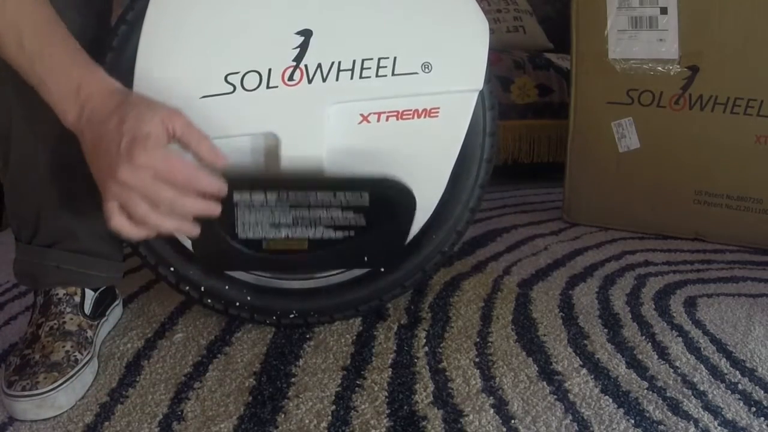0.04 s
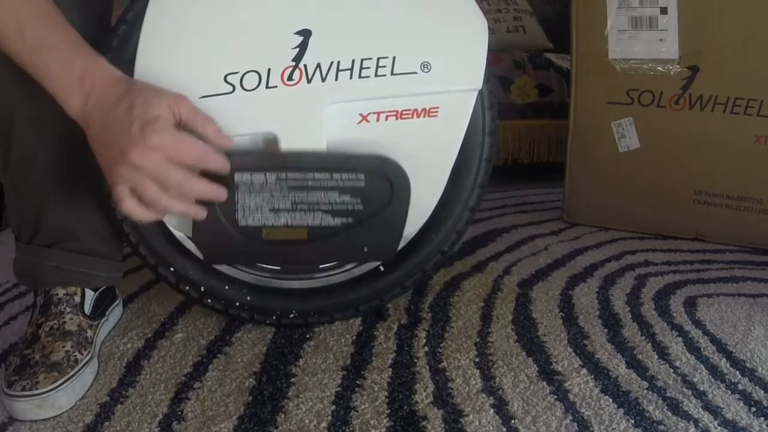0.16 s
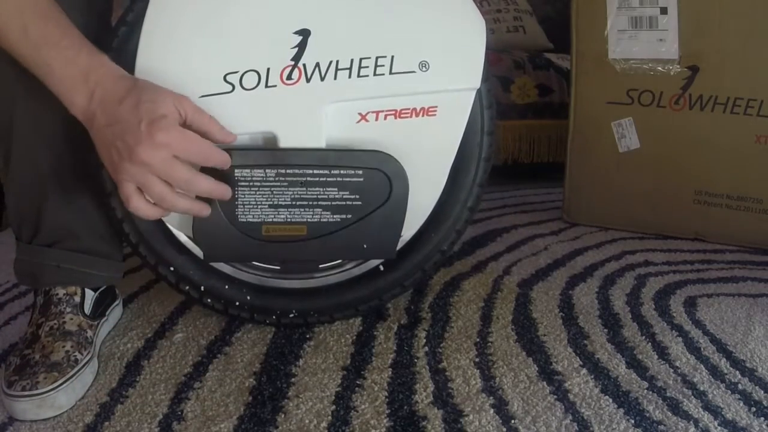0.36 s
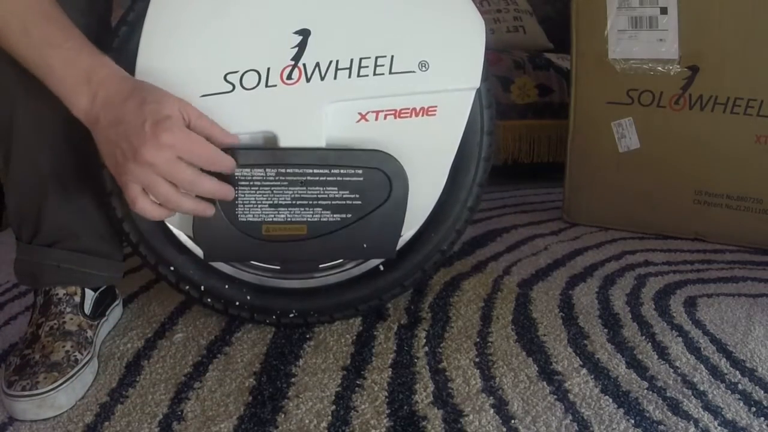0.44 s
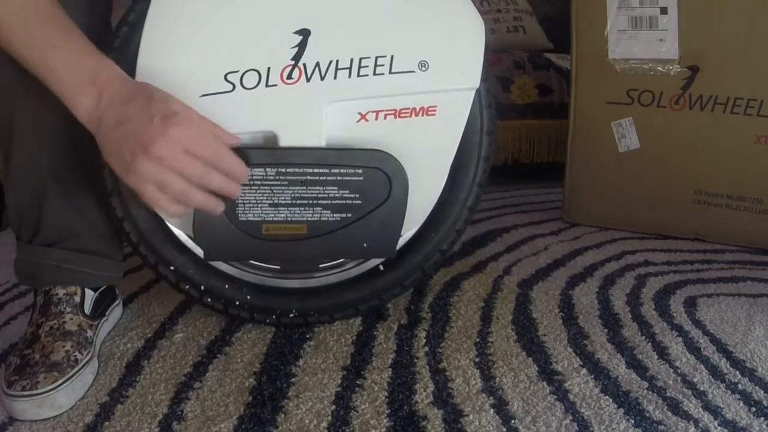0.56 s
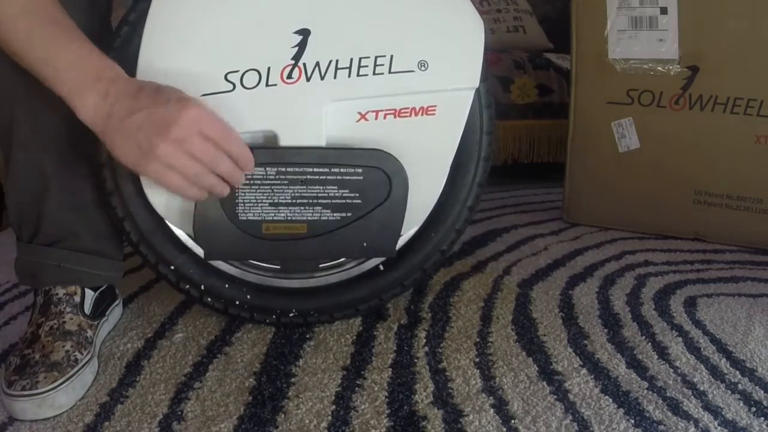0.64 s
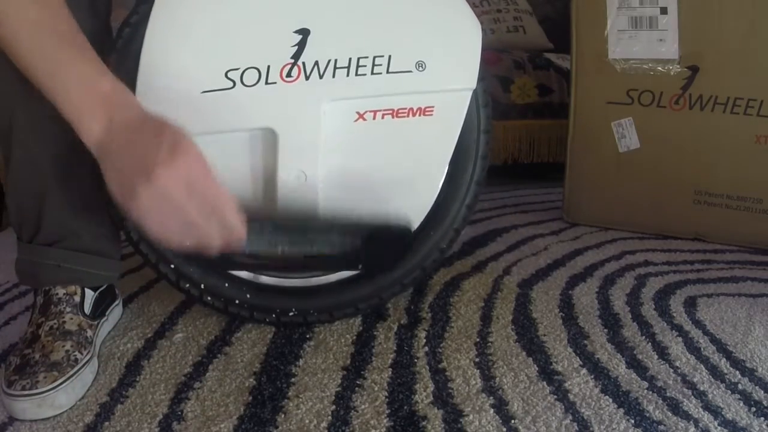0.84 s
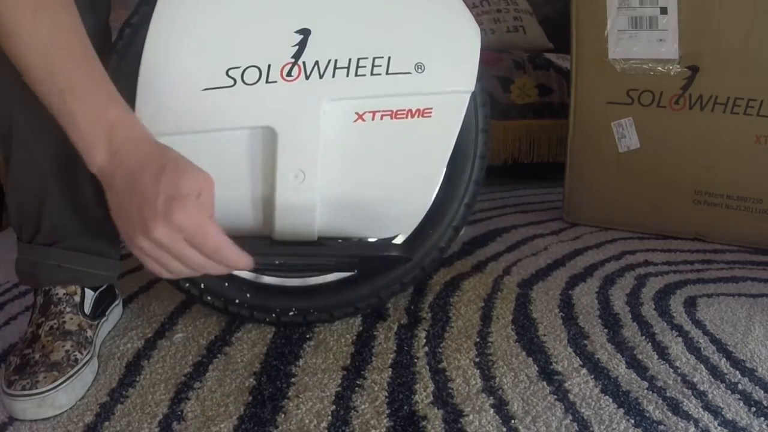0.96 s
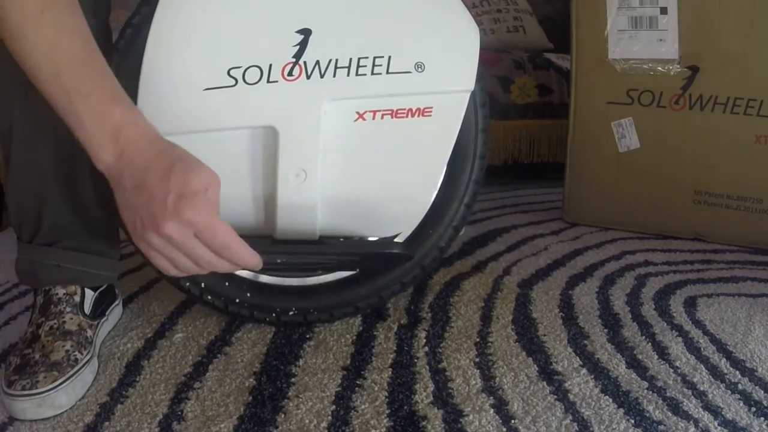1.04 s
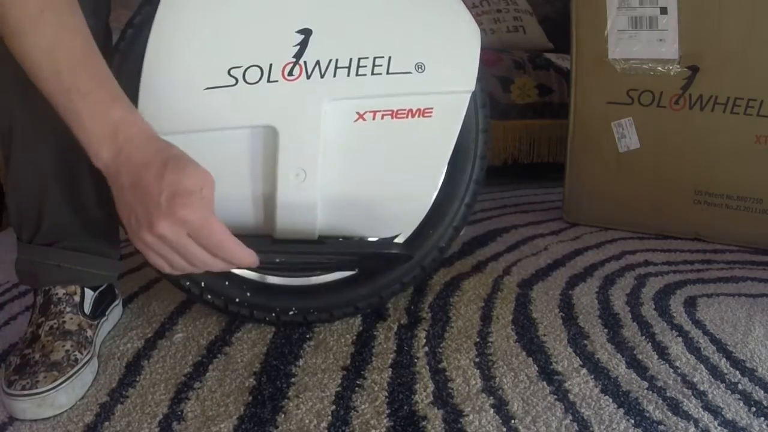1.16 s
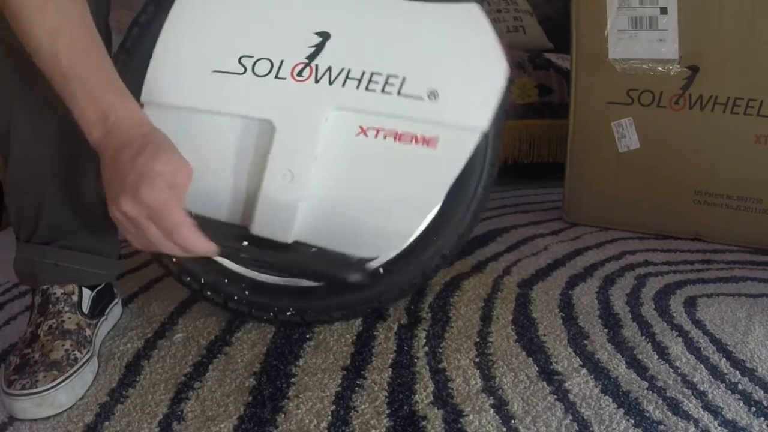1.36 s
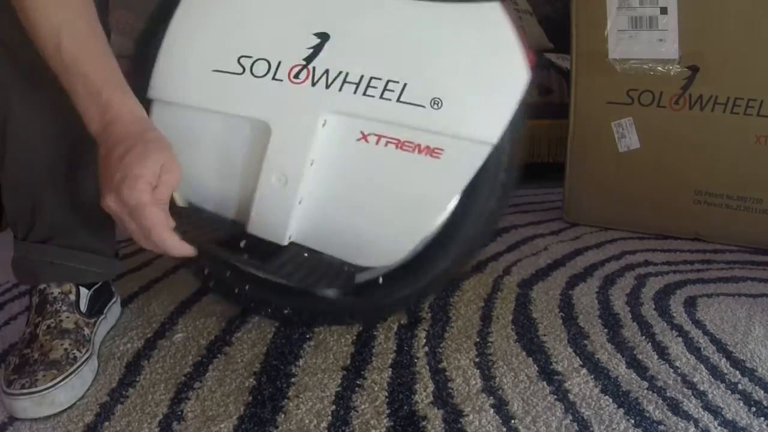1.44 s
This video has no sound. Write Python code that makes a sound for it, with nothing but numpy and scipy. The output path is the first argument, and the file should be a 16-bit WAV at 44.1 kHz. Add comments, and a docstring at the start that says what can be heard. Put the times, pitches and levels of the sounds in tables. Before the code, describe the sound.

A folding footpedal snaps loudly against a hollow plastic shell, then rattles back down with a thud

```python
"""A loud short pop, then two light rattles with a low thud, in a carpeted room with quiet air noise.
A hand folds the metal footpedal of a one-wheeled vehicle up: it snaps against the hollow plastic shell and rings it.
Folded down again, it rattles onto its hinge stop twice and thuds through the tyre; fingers nudge and rub it.
Contacts are filtered clicks that ring tuned modes, with noise for crunch, room tail and air.
The recorder's limiter ducks just ahead of the snap and recovers slowly."""
import sys
import numpy as np
from scipy import signal
from scipy.io import wavfile
from scipy.ndimage import minimum_filter1d

SR = 44100
rng = np.random.default_rng(int(sys.argv[2]) if len(sys.argv) > 2 else 0)


def store_wav(level_fs):
    """Save 16-bit WAV to argv[1]."""
    pcm = np.round(np.clip(np.atleast_2d(level_fs), -1, 1) * 32767)
    wavfile.write(sys.argv[1], SR, pcm.T.astype(np.int16))


def voltage_ratio(decibels):
    """Convert decibels (scalar or array-like) to amplitude ratios, 20 dB per decade."""
    exponent = np.asarray(decibels, float) / 20
    return 10 ** exponent


N = 66150  # 1.5 s


def rms_one(x):
    """Scale to rms 1."""
    return x / np.sqrt(np.mean(x ** 2) + 1e-20)


def at_hz(points, hz):
    """Read a table of (Hz, value) rows on a log-frequency axis."""
    table_hz, values = np.array(points).T
    return np.interp(np.log(hz), np.log(table_hz), values)


BAND_EDGES_HZ = 22 * 2 ** np.arange(0, 9.6, .5)


def bands(length):
    """Half-octave bands of noise with their centres; neighbours are unrelated."""
    settle = 4000  # samples dropped while the filters start up
    white = rng.standard_normal((2, length + settle))
    for k, (low, high) in enumerate(zip(BAND_EDGES_HZ, BAND_EDGES_HZ[1:])):
        band_pass = signal.butter(2, [low, high], "band", fs=SR, output="sos")
        yield np.sqrt(low * high), signal.sosfilt(band_pass, white[k % 2])[settle:]


def decay_per_sample(t60_s):
    """Factor by which a sound dies each sample to lose 60 dB in t60_s."""
    return voltage_ratio(-60 / (t60_s * SR))


def ring(push, modes):
    """A push sets every (Hz, dB, t60 s) mode ringing as a damped sine."""
    out = 0
    for hz, db, t60_s in modes:
        r = decay_per_sample(t60_s)
        w = 2 * np.pi * hz / SR
        resonator = [0, voltage_ratio(db) * np.sin(w)], [1, -2 * r * np.cos(w), r * r]
        out = out + signal.lfilter(*resonator, push + 1e-18)
    return out


def click_train(rows):
    """One impulse for each (s, dB) row."""
    out = np.zeros(N)
    start_s, level_db = np.transpose(rows)
    out[(start_s * SR).astype(int)] = voltage_ratio(level_db)
    return out


def between(x, low_hz, high_hz):
    """High-pass (the body radiates little bass) and low-pass (the contact is soft)."""
    for hz, kind in ((low_hz, "high"), (high_hz, "low")):
        x = signal.lfilter(*signal.butter(2, hz, kind, fs=SR), x)
    return x


# Spectrum of the room and microphone noise: pitch_hz [Hz], level_db [dB per Hz, relative]
AIR_SPECTRUM = [(13, -33), (22, -1), (97, -0.5), (239, -6), (274, -6), (323, -7), (821, -14.5),
                (942, -15.5), (1080, -16), (6250, -32), (15400, -45.5)]
AIR_DB, AIR_FLICKER_DB = -53.5, 0.12  # overall rms, and wander of each band


def air():
    """Steady room and microphone noise, each band flickering a little."""
    out = 0
    for hz, band in bands(N):
        flicker = np.interp(np.arange(N), np.linspace(0, N, 24), rng.standard_normal(24))
        out = out + voltage_ratio(at_hz(AIR_SPECTRUM, hz) + AIR_FLICKER_DB * flicker) * band
    return voltage_ratio(AIR_DB) * rms_one(out)


# How long the carpeted room rings: pitch_hz [Hz], t60_s [s]
ROOM_DECAY = [(100, .4), (400, 0.25), (800, 0.25), (1200, .36), (1900, .3), (3000, 0.39), (6000, 0.3),
              (12000, 0.06)]
# Tone of the room tail: pitch_hz [Hz], level_db [dB, relative]
ROOM_TONE = [(100, 2.1), (300, 4.5), (500, 2.5), (850, 5.3), (1200, -8.7), (1800, -6.1), (3000, -0.5),
             (6000, 4), (12000, 4)]
ROOM_DB, ROOM_DELAY_S = -12.5, 0.0021


def room(x):
    """A diffuse tail: noise dying band by band, after a short gap."""
    t = np.arange(SR // 2) / SR
    tail = 0
    for hz, band in bands(len(t)):
        tail = tail + voltage_ratio(at_hz(ROOM_TONE, hz) - 60 * t / at_hz(ROOM_DECAY, hz)) * band
    # silent for the delay, then fading in over as long again
    tail = tail * np.clip((t - ROOM_DELAY_S) / ROOM_DELAY_S, 0, 1)
    return voltage_ratio(ROOM_DB) * signal.fftconvolve(x, tail / np.sqrt(SR / 100))[:N]


THUD_CONTACT_HZ = 232  # softness of the pushes on tyre and cavity

# Thuds through frame and tyre: start_s [s], level_db [dB, relative]
TYRE_THUDS = [(0.964, -37.5), (0.976, -27), (0.994, -43.5), (1.03, -33)]
# Modes of the tyre: pitch_hz [Hz], level_db [dB, relative], t60_s [s]
TYRE_MODES = [(94.4, -12, 0.47), (169.2, -0.5, 0.14)]


def tyre_thuds():
    """Soft pushes through the frame ring the low modes of the tyre."""
    return ring(between(click_train(TYRE_THUDS), 60, THUD_CONTACT_HZ), TYRE_MODES)


# Late booms of the air inside the shell: start_s [s], level_db [dB, relative]
CAVITY_BOOMS = [(0.268, -8), (0.284, -20)]
# Mode of that air: pitch_hz [Hz], level_db [dB, relative], t60_s [s]
CAVITY_MODES = [(158.3, -7.5, .09)]


def cavity_booms():
    """Soft pushes ring the air inside the shell, just after the snap."""
    return ring(between(click_train(CAVITY_BOOMS), 120, THUD_CONTACT_HZ), CAVITY_MODES)


# Modes of pedal and hinge: pitch_hz [Hz], level_db [dB, relative], t60_s [s]
PEDAL_MODES = [(324, -2, 0.082), (457, -5.5, 0.11), (455, 2.5, 0.022), (820, -10.5, 0.032),
               (900, 0.5, 0.0083), (1188, 3.5, 0.015), (1330, 5, 0.011), (1898, 4, 0.018),
               (2120, 5.5, 0.0099), (2350, -14, 0.029), (2750, -0.5, 0.0093), (3080, -5, 0.016),
               (3640, -3.5, 0.004), (4530, -5, 0.0033), (6300, -5, 0.0024), (8000, -5, 0.0047)]
CLICKS_PER_S, CLICK_SPREAD_DB, RUN_FADE_DB, PEDAL_LEAK_HZ = 5000, 2.5, 1.5, 276


def ring_pedal(rows):
    """Fading runs of uneven clicks ring the pedal; a harder contact passes more treble."""
    t, push = np.arange(N) / SR, 0
    hit = rng.random(N) < CLICKS_PER_S / SR
    sizes = voltage_ratio(CLICK_SPREAD_DB * rng.standard_normal(N)) * rng.choice([-1, 1], N)
    for start_s, length_s, level_db, hardness_hz in rows:
        fade_db = RUN_FADE_DB * np.clip((t - start_s) / length_s, 0, 1)
        level = ((t >= start_s) & (t < start_s + length_s)) * voltage_ratio(level_db - fade_db)
        hit[int(np.ceil(start_s * SR))] = True  # every run opens with a click
        push = push + between(hit * level * sizes + 1e-18, PEDAL_LEAK_HZ, hardness_hz)
    return ring(push, PEDAL_MODES)


# Fingers rub along the pedal: start_s [s], length_s [s], level_db [dB, relative], hardness_hz [Hz]
FINGER_RUBS = [(0.979, 0.013, -53.5, 3020), (1.002, .07, -61, 2900), (1.079, .07, -73, 2500),
               (1.398, 0.25, -76, 1700)]


def finger_rubs():
    """Fingers rubbing along the pedal set off runs of faint clicks in it."""
    return ring_pedal(FINGER_RUBS)


# Pedal against its hinge stop: start_s [s], length_s [s], level_db [dB, relative], hardness_hz [Hz]
HINGE_RATTLES = [(0.9588, 0.0074, -47, 3500), (0.9634, 0.01, -44.5, 3630), (0.9908, 0.0029, -35.5, 6560),
                 (0.995, 0.0074, -37.5, 3930), (1.0146, 0.0013, -44, 900)]


def hinge_rattles():
    """The pedal chatters on its hinge stop in short runs of clicks."""
    return ring_pedal(HINGE_RATTLES)


# Modes of the hollow shell: pitch_hz [Hz], level_db [dB, relative], t60_s [s]
SHELL_MODES = [(130, -4, 0.015), (330, -21.5, 0.33), (451, -21, 0.031), (708, -15, .02),
               (900, -18.5, 0.021), (1065, -12, 0.037), (1200, -0.5, .014), (1237, -7.5, 0.0098),
               (1495, -22, 0.015), (1806, -20.5, 0.036), (2360, -23, .012), (3130, -25, 0.0056),
               (3175, -8, .015)]


def ring_shell(push):
    """Contacts push the plastic shell inward (hence the minus) and ring it."""
    return -ring(push, SHELL_MODES)


# Fingers nudge the pedal against the shell: start_s [s], level_db [dB, relative]
FINGER_NUDGES = [(0.762, -46), (0.822, -45.5), (0.836, -50.5), (1.35, -64)]


def finger_nudges():
    """Soft, faint contacts of the nudged pedal ring the shell."""
    return ring_shell(between(click_train(FINGER_NUDGES), 200, 900))


# Contacts of the pedal on the shell: start_s [s], level_db [dB, relative]
SNAP_CONTACTS = [(0.2413, 12), (0.2430, 7.5), (0.2447, 1.5), (0.2455, -0.9), (0.2562, -4), (0.2587, -3),
                 (0.284, -11.5)]
# Tone of the crunch at each contact: pitch_hz [Hz], level_db [dB per Hz, relative]
CRUNCH_TONE = [(500, 0.5), (1000, 0.5), (2000, 5.5), (3500, -11), (5500, -12), (9000, -24), (11500, -21),
               (13000, -30.5), (15500, -43.5)]
CRUNCH_DB, CRUNCH_T60_S = -23.5, .035
SHELL_LEAK_HZ, SNAP_CONTACT_HZ = 550, 1800


def snap():
    """Contacts ring the shell; each adds a dying burst of crunch noise in step with its strength."""
    clicks = click_train(SNAP_CONTACTS)
    dying = signal.lfilter([1], [1, -decay_per_sample(CRUNCH_T60_S)], clicks + 1e-18)
    crunch = rms_one(sum(voltage_ratio(at_hz(CRUNCH_TONE, hz)) * band for hz, band in bands(N) if hz > 400))
    shell = ring_shell(between(clicks, SHELL_LEAK_HZ, SNAP_CONTACT_HZ))
    return shell + voltage_ratio(CRUNCH_DB) * dying * crunch


def scene():
    """Pedal sounds with their room, over the air noise, at one microphone."""
    pedal = tyre_thuds() + cavity_booms() + finger_rubs() + hinge_rattles() + finger_nudges() + snap()
    return (pedal + room(pedal) + air())[None]


LIMIT_DB, LOOK_AHEAD_S, ATTACK_S, RELEASE_DB_PER_S = 0.5, .021, 0.006, 15.5


def limiter(dry):
    """Cuts peaks over the limit, starting ahead of them, and recovers at a steady dB rate."""
    over_db = np.maximum(20 * np.log10(np.abs(dry[0]) + 1e-9) - LIMIT_DB, 0)
    # spread each peak by the look-ahead time to both sides
    over_db = -minimum_filter1d(-over_db, 2 * int(LOOK_AHEAD_S * SR) + 1)
    release_db = RELEASE_DB_PER_S * np.arange(N) / SR
    cut_db = np.maximum.accumulate(over_db + release_db) - release_db
    r = np.exp(-1 / (ATTACK_S * SR))
    return dry * voltage_ratio(-signal.lfilter([1 - r], [1, -r], cut_db))


def band_limit(x):
    """A steep low-pass at the top of the band."""
    return signal.sosfilt(signal.butter(12, 15590, fs=SR, output="sos"), x)


def record(dry):
    """The recorder's look-ahead limiter, then a steep cut of the top."""
    limited = limiter(dry)
    top_cut = signal.cheby2(10, 50, 15600, fs=SR, output="sos")  # 50 dB down from 15600 Hz
    mix = signal.sosfilt(top_cut, limited)
    return band_limit(mix)


dry = scene()
out = record(dry)
store_wav(out)
```